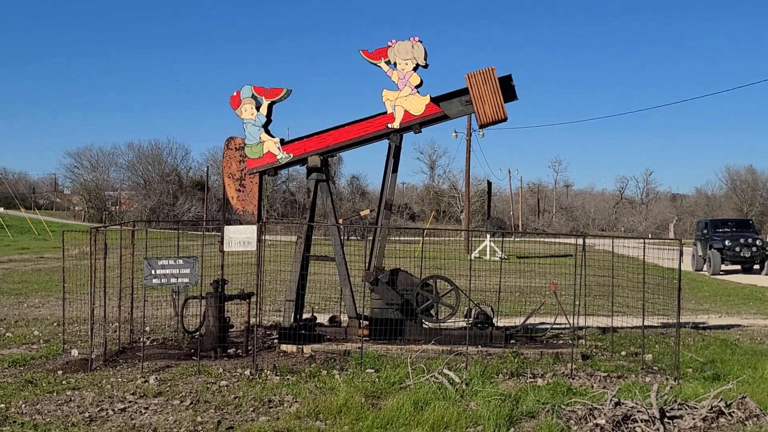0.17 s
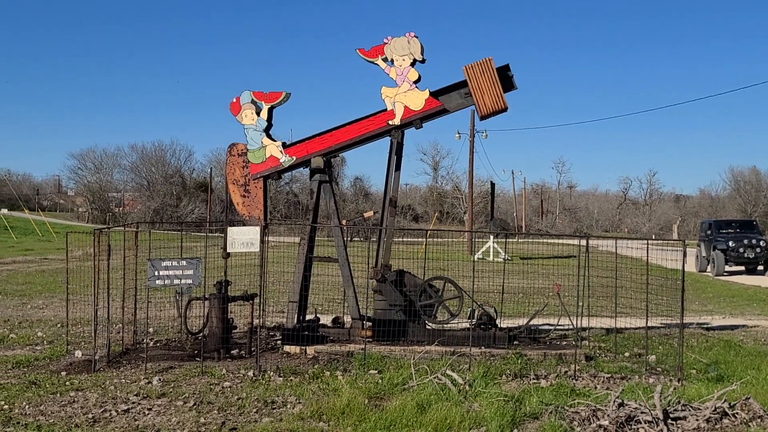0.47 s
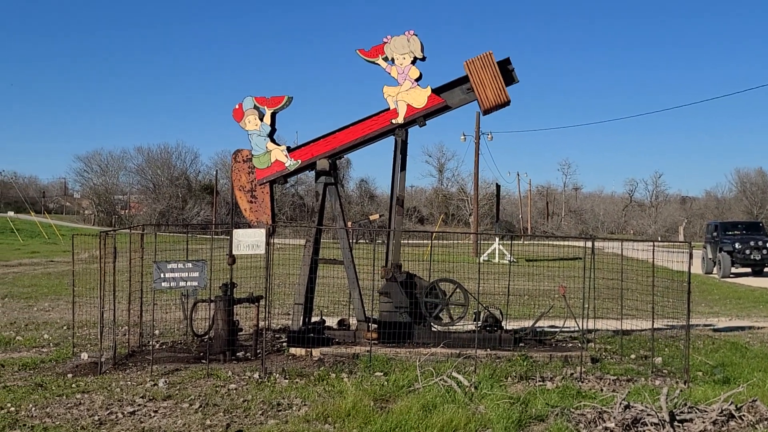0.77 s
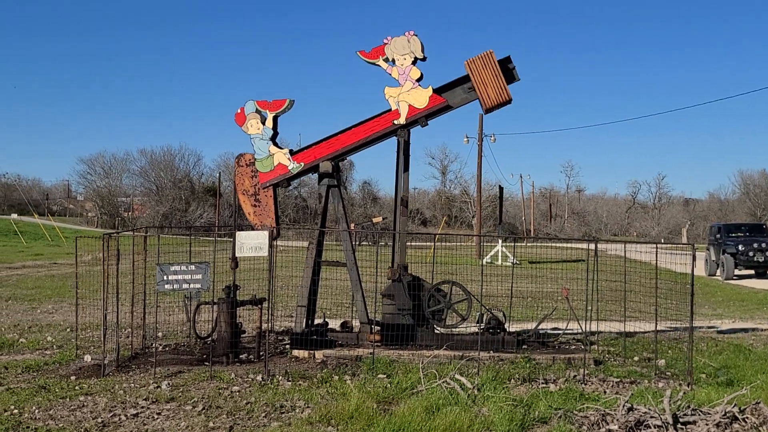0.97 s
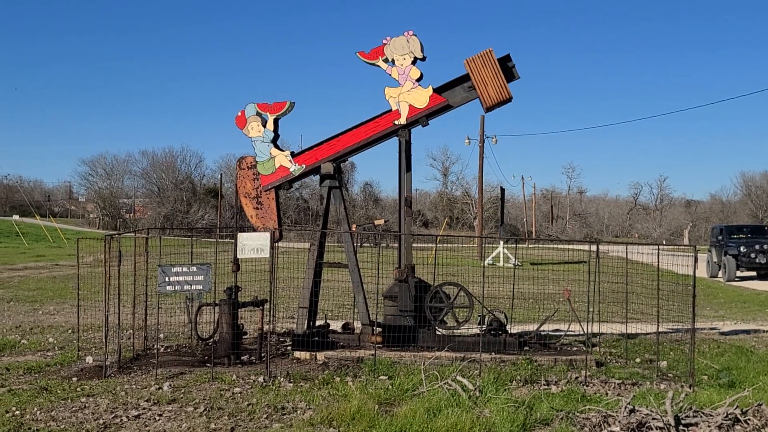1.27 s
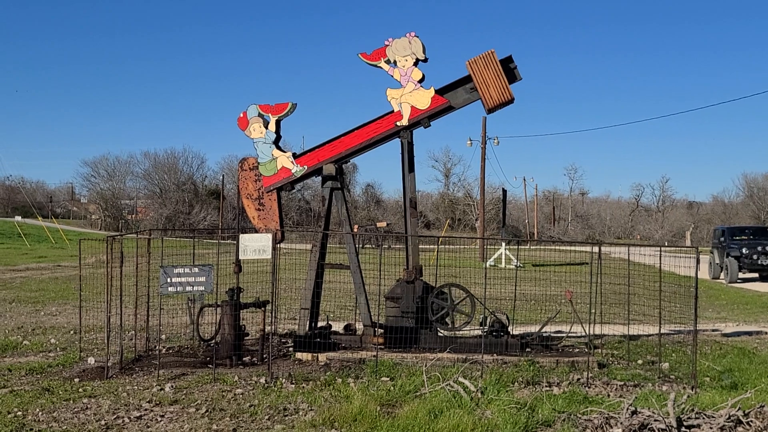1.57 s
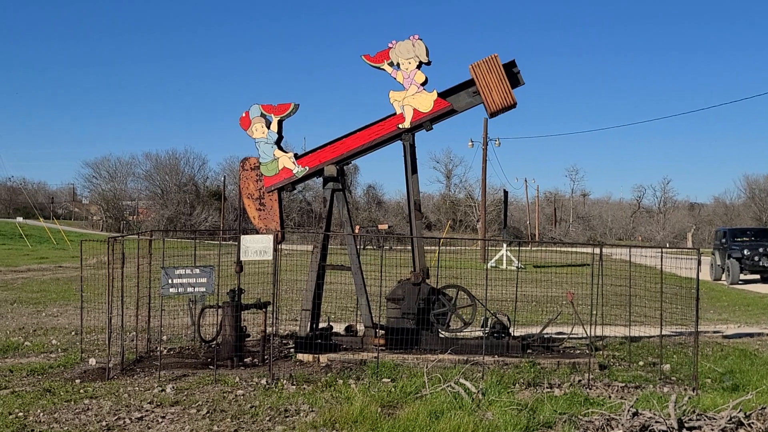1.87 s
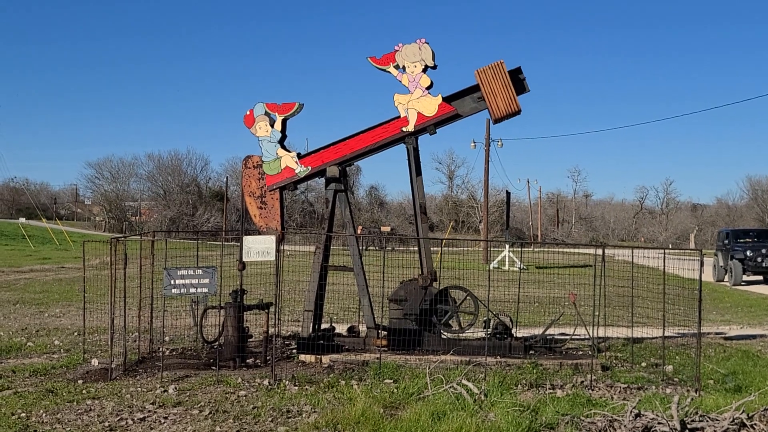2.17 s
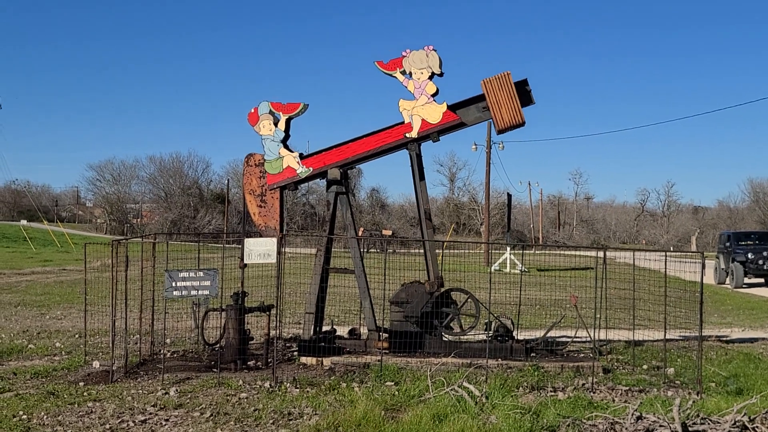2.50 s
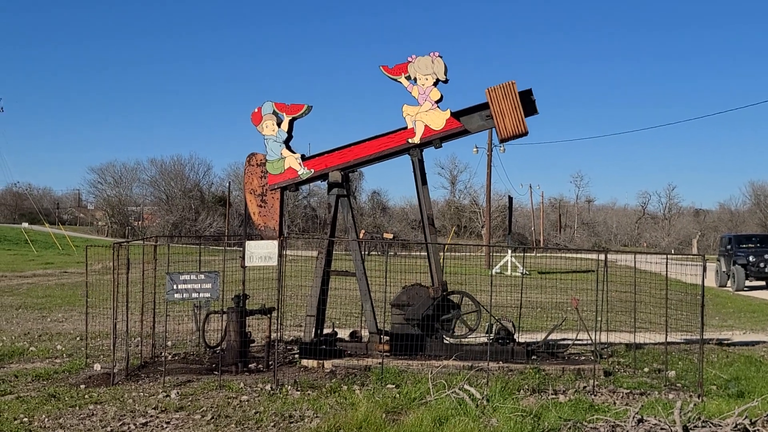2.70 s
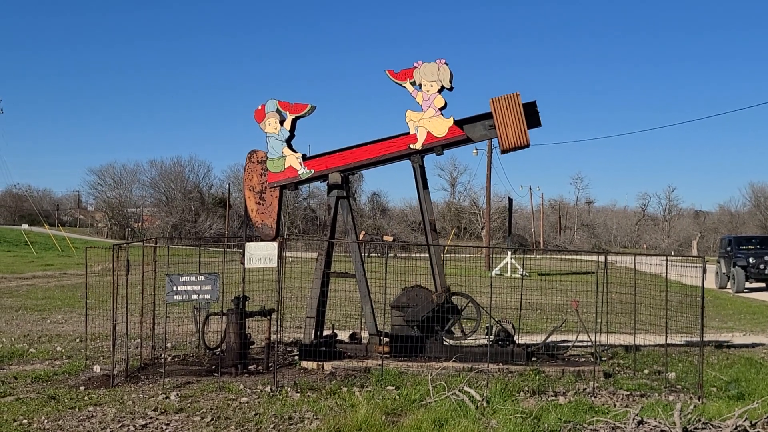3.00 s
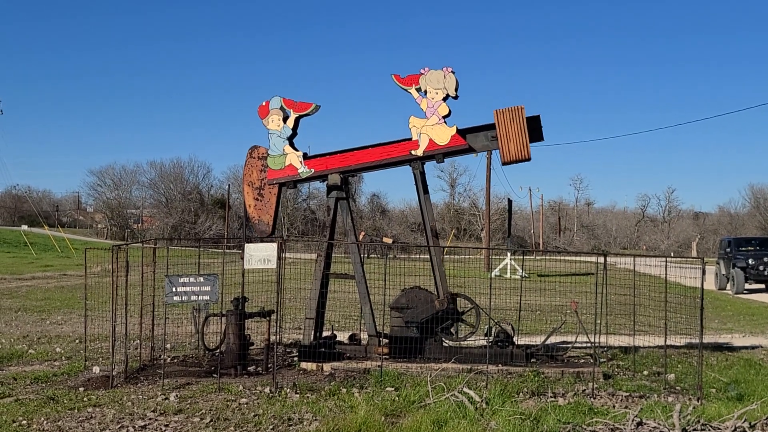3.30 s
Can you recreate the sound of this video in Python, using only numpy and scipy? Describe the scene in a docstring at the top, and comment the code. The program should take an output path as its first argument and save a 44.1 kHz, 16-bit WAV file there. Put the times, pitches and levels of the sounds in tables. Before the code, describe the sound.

A vehicle draws away across an open field: tyre roar with a wavering mid-pitched whine and low drone, strongest at first and fading after 1.6 s. Quick hollow thumps at 1.4-1.65 s. Underneath, unsteady motor hum, low rumble, far traffic and high, fast cricket trills, a different one each side. Wind buffets the right microphone, strongest near 2.35 s and the end. Tiny tick at 2.6 s; loose steel clanks and rings at 3.0-3.25 s.

```python
"""Vehicle leaving along a field road

An open field beside a road, two microphone ports: tyres roar (noise) and sing (a wandering tone) as a vehicle
draws away and thumps over road joints (decaying noise and sines), its engine a low drone.
A motor hums in sines over a noise rumble, struck steel clanks in decaying modes, and noise gusts buffet the
right port. Far traffic is steady noise; crickets trill in gated tones over a noise hiss of far insects and air."""
import sys
import numpy as np
from scipy import signal
from scipy.fft import rfft, irfft, next_fast_len
from scipy.io import wavfile
from scipy.ndimage import uniform_filter1d, map_coordinates

SR = 44100
rng = np.random.default_rng(int(sys.argv[2]) if len(sys.argv) > 2 else 0)


def how_loud(loudness_db):
    """Turn decibels into a plain amplitude multiplier (0 dB gives 1, 20 dB gives 10)."""
    steps = np.asarray(loudness_db, float) / 20
    return 10 ** steps


def transcribe(signal):
    """Save signal, clipped to [-1, 1], as a 16-bit WAV file at the path in sys.argv[1]."""
    frames = np.atleast_2d(signal).T
    limited = np.clip(frames, -1, 1)
    pcm = np.round(limited * 32767).astype(np.int16)
    wavfile.write(sys.argv[1], SR, pcm)


N = 152145
T = np.arange(N) / SR


def unit(x):
    """Scaled to rms 1."""
    return x / np.sqrt(np.mean(x ** 2) + 1e-20)


def along(points, hz):
    """(Hz, value) points read on a log frequency axis."""
    f, v = np.transpose(points)
    return np.interp(np.log(hz + 1), np.log(f + 1), v)


def curves(rows):
    """One value per sample for each column after the time."""
    s, *cols = np.transpose(rows)
    return [np.interp(T, s, c) for c in cols]


def wobble(rate):
    """A smooth random curve, rate knots a second."""
    knots = rng.standard_normal(int(N * rate / SR) + 4)
    return map_coordinates(knots, [T * rate])


def filtered(x, response):
    """x times a complex response of frequency."""
    m = next_fast_len(N + 8192)
    spectrum = rfft(x, m) * response(np.fft.rfftfreq(m, 1 / SR))
    return irfft(spectrum, m)[..., :N]


def peak(centre_hz, width_hz):
    """A causal resonance."""
    return lambda f: 1j * f * width_hz / (centre_hz ** 2 - f * f + 1j * f * width_hz)


def patchy(patchy_db, channels=1):
    """White noise with patches of random gain, shared by its channels."""
    z = signal.stft(rng.standard_normal((channels, N)), nperseg=512)[2]
    field = uniform_filter1d(rng.standard_normal(z.shape[1:]), 6, 0)
    field = uniform_filter1d(field, 10, 1)
    return signal.istft(z * how_loud(patchy_db * unit(field)), nperseg=512)[1][:, :N]


def coloured(x, spectrum):
    """x through a (Hz, dB) spectrum, rms 1."""
    return unit(filtered(x, lambda hz: how_loud(along(spectrum, hz))))


def tone(hz, drift_hz, rate):
    """A sine of rms 1 whose pitch wanders."""
    cycles = np.cumsum(hz + drift_hz * wobble(rate)) / SR
    return np.sqrt(2) * np.sin(2 * np.pi * (cycles + rng.random()))


def ports(direct, lead_ms, pan_db):
    """The right port hears it later by lead_ms, the left louder by twice pan_db."""
    heard_at = np.clip(np.arange(N) - lead_ms * SR / 1000, 0, N - 1)
    late = map_coordinates(direct, [heard_at], order=3)
    return np.array([direct * how_loud(pan_db), late * how_loud(-pan_db)])


# far insects and air, relative spectrum at each port: f/Hz, left level/dB, right level/dB
HISS_SPECTRUM = [(2410, -10, 3), (4850, 6.5, 7.5), (5350, -1.5, 3.5), (6790, 5.5, 6), (7460, -2, -21),
                 (7900, 0.5, -8), (8800, 0, 2.5), (9810, 6, 8), (9860, -17, -34), (10500, -38, -33),
                 (10580, -36, -34), (11820, -12, -11.5), (15900, -13, -12)]


def hiss():
    """Far insects and air: patchy noise with its own spectrum at each port."""
    hz, *sides = np.transpose(HISS_SPECTRUM)
    spectra = [[(1500, -60), *zip(hz, side), (15760, -120)] for side in sides]
    noise = filtered(patchy(2.04, channels=2), lambda f: how_loud([along(s, f) for s in spectra]))
    return how_loud(-59.5) * unit(noise)


# a farther, patchy singer: f/Hz, pitch wander/Hz, left level/dB, right level/dB
FAR_SINGER = (4252.5, 66.5, -81, -72.5)


def far_singer():
    """A farther insect: a tone whose pitch and level flicker at random."""
    hz, wander_hz, left_db, right_db = FAR_SINGER
    song = tone(hz, wander_hz, 210) * how_loud(4.5 * wobble(24.76))
    return song * how_loud([[left_db], [right_db]])


# cricket phrases: first stroke's middle t/s, end t/s, stroke rate f/Hz, cricket number
TRILLS = [(.0017, 2.615, 60.34, 0), (2.712, 3.5, 60.24, 0), (.0058, 2.44, 60.53, 1),
          (2.4508, 3.5, 60.37, 1)]
# near crickets: f/Hz, pitch wander/Hz, left level/dB, right level/dB, stroke length t/s
CRICKETS = [(8610, 70, -59, -88, 0.0125), (9550, 360, -98, -60.5, 0.009)]


def crickets():
    """Two near crickets trill in steady wing strokes; the wing slows as each stroke ends."""
    sag_hz = 900
    out = np.zeros((2, N))
    for start, end, rate, who in TRILLS:
        hz, wander_hz, left_db, right_db, stroke_s = CRICKETS[who]
        # seconds from the middle of the nearest stroke
        since = ((T - start) * rate + .5) % 1 / rate - .5 / rate
        stroke = np.cos(np.pi * np.clip(since / stroke_s, -.5, .5))
        gate = stroke * (T > start - .5 / rate) * (T < end)
        pitch = hz - sag_hz * np.clip(2 * since / stroke_s, 0, 1) ** 3
        wing = tone(pitch, wander_hz, 110) * gate
        wing = filtered(wing, lambda f: np.exp(-((f - hz) / (wander_hz + sag_hz)) ** 4))
        out = out + wing * how_loud(1.1 * wobble(27.65)) * how_loud([[left_db], [right_db]])
    return out


# far traffic, relative spectrum (f/Hz, level/dB); its level/dB; left port's lead/ms; diffuse part's level/dB
ROAD_SPECTRUM = [(88, -36), (150, -4), (296, -17), (443, -2.5), (655, -23), (1090, -3), (3050, -28),
                 (6710, -120)]
ROAD_DB, ROAD_LEAD_MS, ROAD_DIFFUSE_DB = -47.5, 0.13, -1


def road():
    """Far traffic: steady coloured noise, part from one side and part diffuse."""
    noise = coloured(patchy(0.44, channels=3), ROAD_SPECTRUM) * how_loud(ROAD_DB + 0.53 * wobble(4.5))
    return ports(noise[0], ROAD_LEAD_MS, pan_db=1.5) + how_loud(ROAD_DIFFUSE_DB) * noise[1:]


# low rumble over time: t/s, level/dB before its wobble and tilt between ports
RUMBLE_LEVEL = [(0, -44), (.5, -44.5), (1, -43), (1.4, -56), (1.6, -37.5), (2, -47.5), (2.6, -40),
                (3.45, -42)]
# its relative spectrum: f/Hz, level/dB
RUMBLE_SPECTRUM = [(15, -57), (28, -8), (45, 7), (70, 2), (100, 0.5), (140, -11.5), (200, -10),
                   (310, -18.5), (900, -120)]


def rumble():
    """Low noise whose level is lumpy, a little stronger at the right port."""
    level_db = curves(RUMBLE_LEVEL)[0]
    noise = coloured(rng.standard_normal(N), RUMBLE_SPECTRUM)
    return noise * how_loud(level_db + 4.3 * wobble(18)) * how_loud([[-.4], [.4]])


# motor lines: f/Hz, level/dB before wobble and tilt
MOTOR_LINES = [(47, -48), (66, -43.5), (72.5, -49.5), (109.8, -45.5), (131, -57)]


def motor():
    """Low hum lines, each unsteady in pitch and level, a little stronger at the right port."""
    lines = sum(tone(hz, 0.57, 3.9) * how_loud(db + 1.85 * wobble(4.12)) for hz, db in MOTOR_LINES)
    return lines * how_loud([[-.4], [.4]])


# wind over time: t/s, level/dB before wobble and port gains
GUST_LEVEL = [(0, -50), (.45, -38), (.85, -39), (1.2, -40), (1.45, -46.5), (1.62, -34.5), (2, -53),
              (2.15, -33.5), (2.27, -30.5), (2.36, -22.5), (2.45, -39.5), (2.7, -31.5), (2.87, -31.5),
              (3.05, -37), (3.3, -47), (3.44, -25)]
# its relative spectrum: f/Hz, level/dB
GUST_SPECTRUM = [(12, -56), (20, -35), (54, -1.5), (76, -5.5), (261, -36.5), (400, -31), (520, -66),
                 (880, -120)]


def wind():
    """Lumpy low noise buffeting the microphone, nearly all on the right port."""
    level_db = curves(GUST_LEVEL)[0]
    lumps_db = 2.2 * np.array([wobble(16), wobble(18)])
    buffets = coloured(rng.standard_normal((2, N)), GUST_SPECTRUM) * how_loud(level_db + lumps_db)
    return buffets * how_loud([[-14], [0.5]])


# contacts: t/s, ring level/dB, rattle level/dB, dull above f/Hz (lower for softer contacts)
CLANKS = [(3.010, -38, -40, 7000), (3.017, -27.5, -36.5, 5900), (3.121, -39.5, -30.5, 2970),
          (3.143, -34.5, -42, 2000), (3.199, -34, -40, 1200), (3.254, -44, -50, 900)]
# modes of the steel: f/Hz, level/dB relative to the ring, 60 dB decay t/s
STEEL_MODES = [(345.7, -1.5, 1.1), (368.2, -5, 1.3), (442, -17, 0.38), (540, -12, 0.34), (690, -6, 0.07),
               (820, -8.5, 0.087), (1282, -3, 0.16), (3510, -20.5, 0.052)]


def resonant_noise(centre_hz, width_hz):
    """Noise of rms 1 through a resonance twice."""
    return unit(filtered(rng.standard_normal(N), lambda f: peak(centre_hz, width_hz)(f) ** 2))


def clanks():
    """Each contact cracks, booms, damps the old ring and rings the loose steel anew; one small tick besides."""
    attack_s, damp_s, crack_t60_s, body_t60_s = 0.0013, 0.003, 0.069, 0.27
    out = np.zeros(N)
    for s, ring_db, rattle_db, dull_hz in CLANKS:
        t = np.maximum(T - s, 0)
        ring = sum(how_loud(level - 60 * t / t60 + 2.5 * wobble(45)) * np.sin(2 * np.pi * hz * t)
                   for hz, level, t60 in STEEL_MODES)
        crack = resonant_noise(1400, 2600) * how_loud(-60 * t / crack_t60_s)
        body = resonant_noise(600, 700) * how_loud(-3.5 - 60 * t / body_t60_s)
        blow = how_loud(ring_db) * ring + how_loud(rattle_db) * (crack + body)
        blow = blow * (1 - np.exp(-t / attack_s))
        damped = out * np.exp(-t / damp_s)
        out = damped + filtered(blow, lambda f: 1 / (1 + 1j * f / dull_hz) ** 4)
    tick_s, tick_db, tick_hz, tick_len_s = 2.598, -37, 2710, 0.001
    tick_shape = np.exp(-((T - tick_s) / tick_len_s) ** 2)
    out = out + how_loud(tick_db) * tick_shape * np.sin(2 * np.pi * tick_hz * T)
    return out * how_loud([[-.6], [.6]])


# the vehicle's engine: t/s, f/Hz, level/dB
DRONE = [(0, 57.25, -37), (.55, 56.5, -37.5), (.8, 54.93, -53), (1.2, 53.3, -38), (1.5, 56.75, -52),
         (2.1, 55.3, -46), (2.8, 56.35, -54), (3.45, 57.3, -70)]


def engine():
    """A low sine drone, equal at both ports, its pitch and level shifting."""
    hz, level_db = curves(DRONE)
    return tone(hz, 0.22, 5) * how_loud(level_db)


# tyre thumps over the joints: t/s, noise level/dB at onset, centre f/Hz, width f/Hz, 60 dB decay t/s
THUMPS = [(1.417, -30.5, 640, 450, 0.13), (1.444, -29.5, 575, 400, 0.09), (1.476, -37.5, 572, 400, 0.062),
          (1.574, -26.5, 1104, 400, .07), (1.577, -30, 1885, 200, 0.094), (1.589, -37, 181, 248, 0.11),
          (1.593, -33.5, 557, 595, 0.25), (1.654, -35, 662, 470, 0.1)]


def thumps():
    """Each joint struck gives a decaying burst: resonant noise and a sine at its centre."""
    ring_db, attack_s = -4.2, 0.0015  # ring_db: the sine's peak over the noise rms
    out = 0
    for s, db, hz, width_hz, t60 in THUMPS:
        t = np.maximum(T - s, 0)
        noise = filtered(rng.standard_normal(N),
                         lambda f: peak(hz, width_hz)(f) ** 2 / (1 + (f / 2500) ** 2))
        burst = unit(noise) + how_loud(ring_db) * np.sin(2 * np.pi * hz * t)
        out = out + burst * (1 - np.exp(-t / attack_s)) * how_loud(db - 60 * t / t60)
    return ports(out, lead_ms=0.14, pan_db=0.1)


# the passing tyres: t/s, roar level/dB, tread tone level/dB (before wobbles), left port's lead/ms
TYRES = [(0, -38, -49, 0.37), (.3, -37, -37.5, 0.37), (.62, -39, -46.5, 0.35), (.9, -42, -39.5, 0.37),
         (1.13, -40, -45.5, 0.35), (1.3, -39.5, -40, 0.32), (1.47, -39.5, -40.5, 0.32),
         (1.54, -39, -55, 0.28), (1.9, -43.5, -70, 0.29), (2.4, -48, -54, 0.15), (3.45, -50, -62, 0.13)]
# relative spectrum of the roar: f/Hz, level/dB
ROAR_SPECTRUM = [(88, -58), (150, -22), (411, -8), (455, -12), (725, -2), (812, -6), (993, -6.5),
                 (1890, -6.5), (3050, -31), (3960, -45), (6710, -120)]


def tyres():
    """Roar and singing tread reach the left port first, the lead shrinking as they leave; echoes surround."""
    tread_hz, tread_wander_hz, tread_sag_hz_per_s, diffuse_db = 834, 24, 17, -0.5
    roar_db, tread_db, lead_ms = curves(TYRES)
    roar = coloured(patchy(1.0, channels=3), ROAR_SPECTRUM) * how_loud(roar_db + 0.91 * wobble(6.42))
    tread = tone(tread_hz - tread_sag_hz_per_s * T, tread_wander_hz, 110)
    tread = tread * how_loud(tread_db + 2.1 * wobble(16))
    echoes = how_loud(diffuse_db) * roar[1:]  # from all sides
    return ports(roar[0] + tread, lead_ms, pan_db=0.37) + echoes


def scene():
    """All sources together, from the far field to the vehicle."""
    background = hiss() + far_singer() + crickets() + road() + rumble() + motor()
    return background + wind() + clanks() + engine() + thumps() + tyres()


def low_pass(x):
    """Removes everything above the highest recorded frequency."""
    return signal.sosfilt(signal.butter(12, 15730, fs=SR, output="sos"), x)


def record(dry):
    """The finished mix as it is kept."""
    return low_pass(dry)


dry = scene()
out = record(dry)
transcribe(out)
```